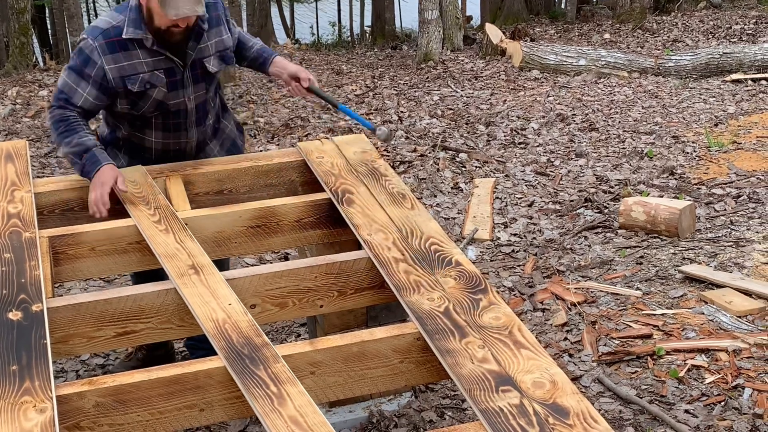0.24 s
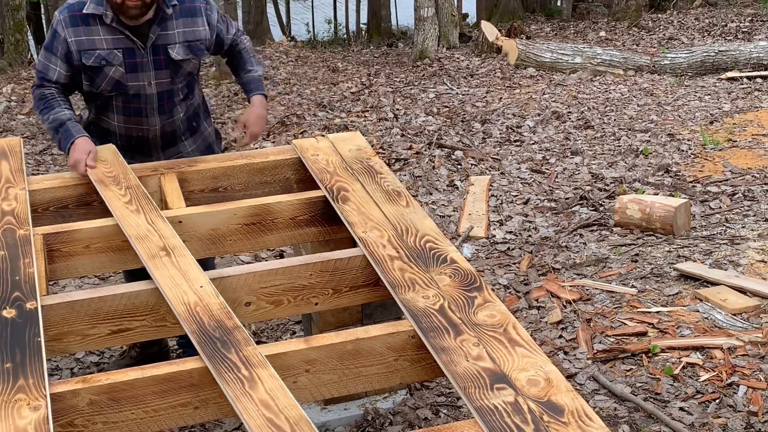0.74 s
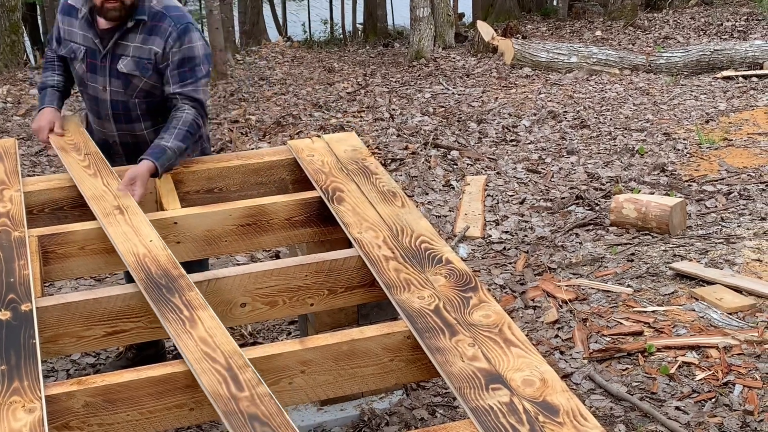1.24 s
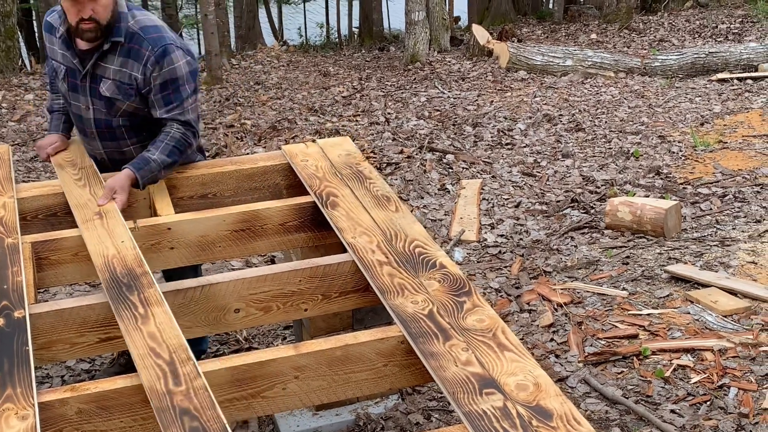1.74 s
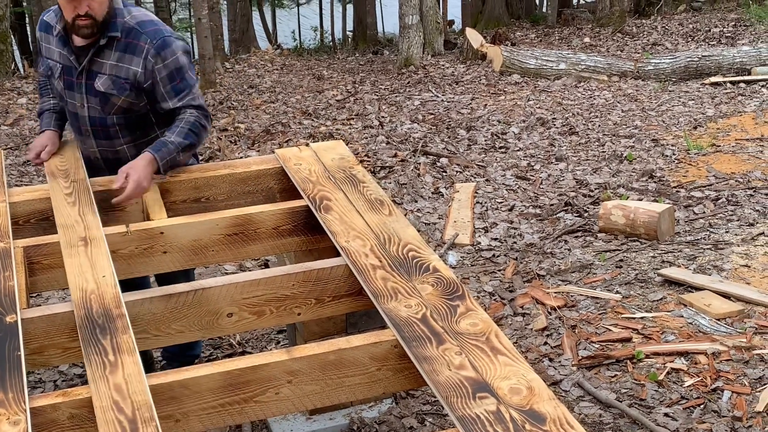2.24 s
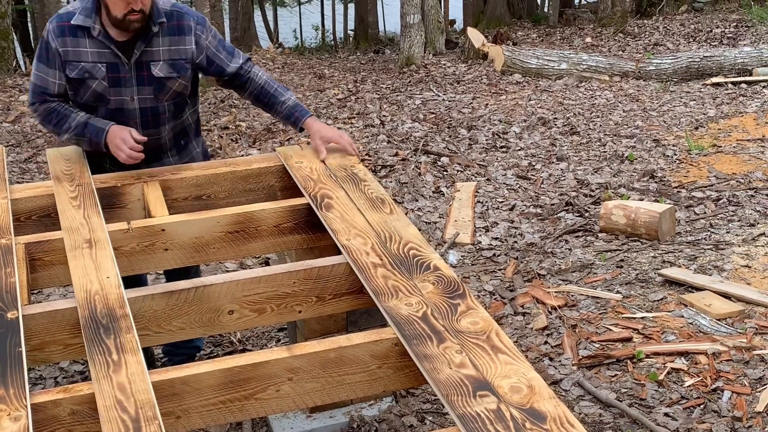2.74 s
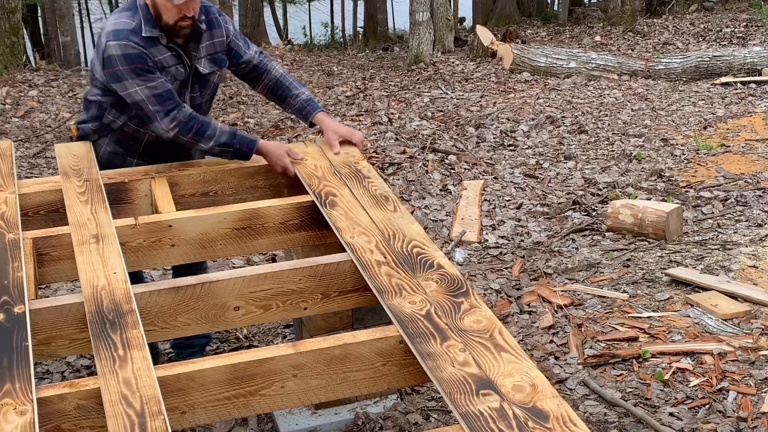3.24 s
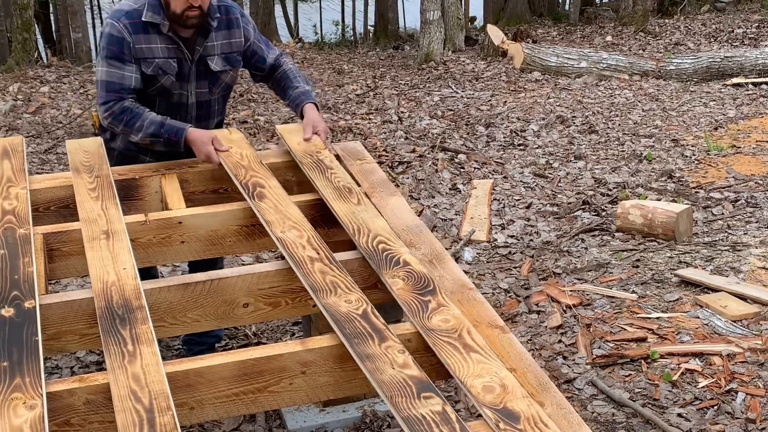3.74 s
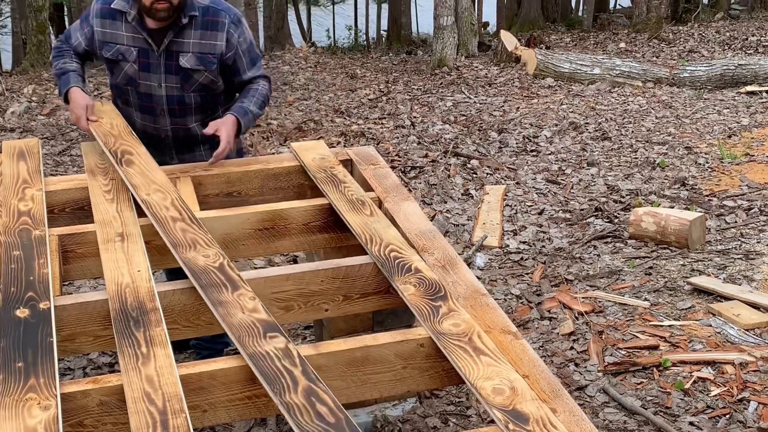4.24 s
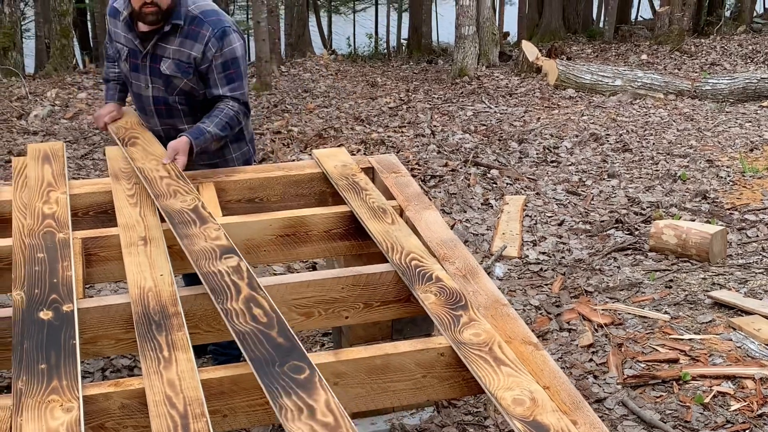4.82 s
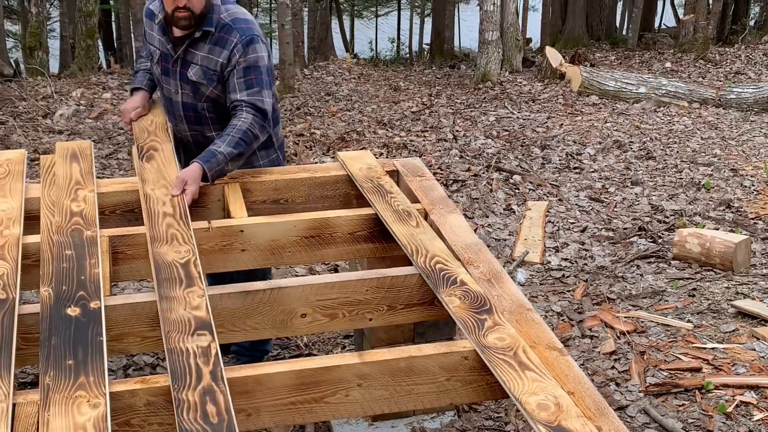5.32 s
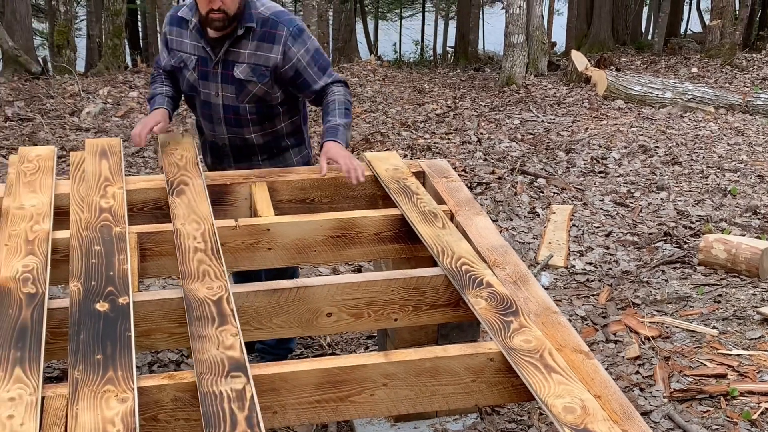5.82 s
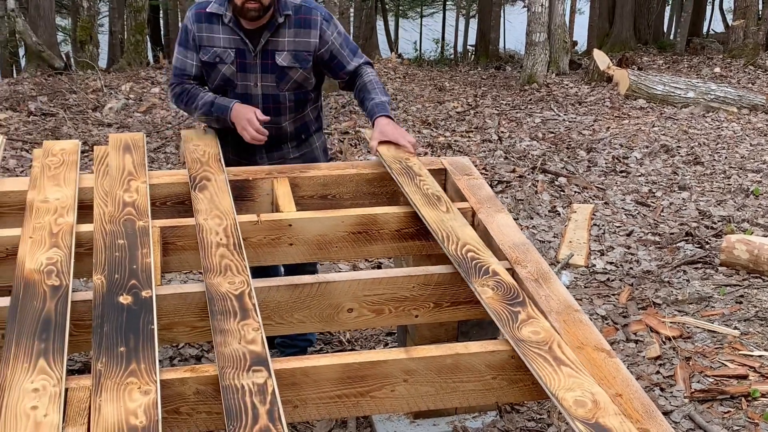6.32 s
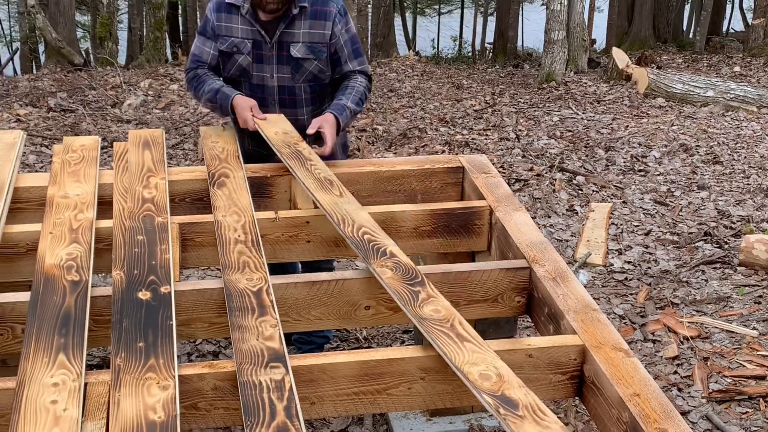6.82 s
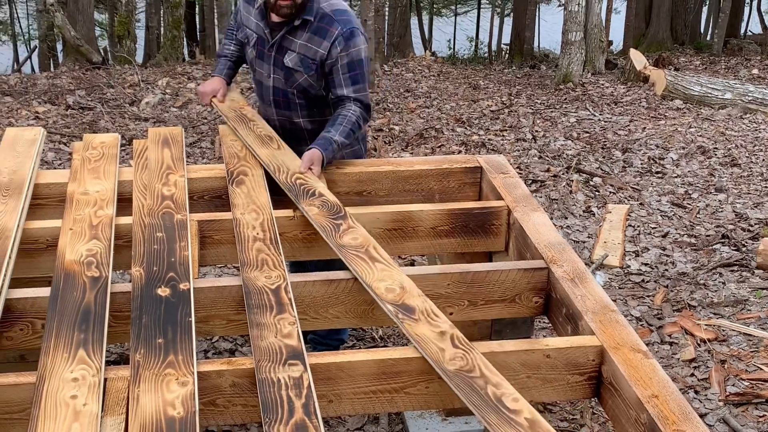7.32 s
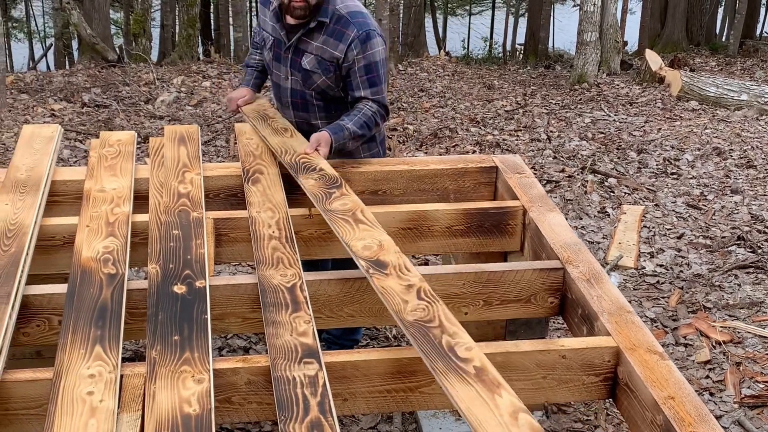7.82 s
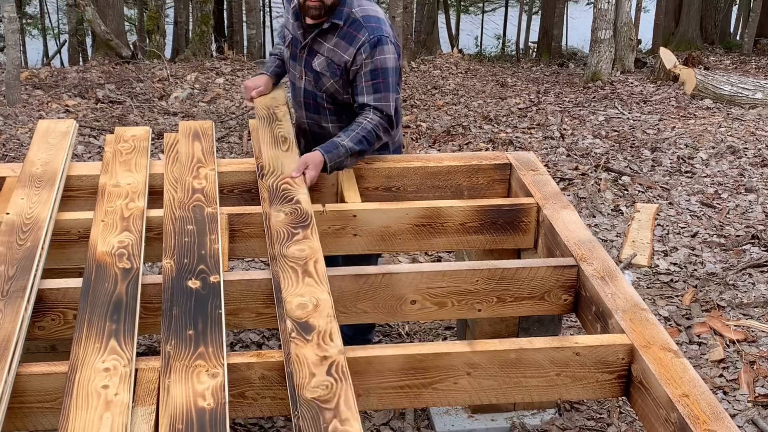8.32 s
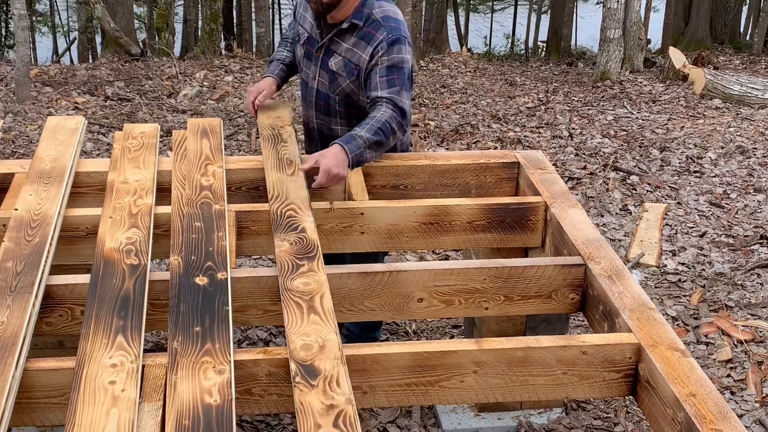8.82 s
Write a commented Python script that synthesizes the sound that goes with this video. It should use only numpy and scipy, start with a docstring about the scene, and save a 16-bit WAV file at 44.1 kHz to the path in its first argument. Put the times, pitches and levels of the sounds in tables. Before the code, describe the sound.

In still woodland, a close microphone picks up planks being moved by hand across wooden joists. They slide with a dry rasp and hiss, then land in short bouncing clacks that make the timber ring briefly. Three loud clatters fall in the first two thirds, followed by gentle scraping and a couple of lighter drops. The trees add a short dull echo over faint outdoor air.

```python
"""Long softwood boards are dropped, lifted and slid on a frame of joists in a quiet wood.
Each drop is a short rattle of contacts that rings the timber's modes. Sliding grain rasps and hisses;
a jolted or dragged board hums on one mode. Behind them: faint air and a dull tail from the trees.
Two close microphone ports hear almost the same timber sound, the treble later on the right."""
import sys
import numpy as np
from scipy import signal
from scipy.fft import rfft, irfft, next_fast_len
from scipy.io import wavfile

SR = 44100
rng = np.random.default_rng(int(sys.argv[2]) if len(sys.argv) > 2 else 0)


def wav_record(signal):
    """Record a signal, one row per channel, as 16-bit PCM in the file named by sys.argv[1]."""
    frames = np.transpose(np.atleast_2d(signal))
    bounded = np.clip(frames, -1, 1)
    # unit amplitude maps onto the largest positive 16-bit level
    quanta = np.round(bounded * 32767).astype(np.int16)
    wavfile.write(sys.argv[1], SR, quanta)


N = 400428

# swell of air and handling noise: time_s, level_db
BACKGROUND_SWELL = [(0, 1.5), (1.4, 3.5), (1.6, 1), (1.95, 1.5), (2.8, 2), (4.5, 1), (4.9, -1), (5.3, 2),
                    (6.2, 2.5), (7.4, 0.5), (7.8, 0.5), (8.25, 1), (9.08, 5)]
# outdoor air: freq_hz, level_db
AIR_SPECTRUM = [(25, -20.5), (45, 25.5), (76, -3.5), (400, 3), (1440, 1.5), (2500, -12.5), (4000, -14),
                (6500, -51.5), (10000, -52.5), (16000, -54.5)]
# phase between the ports: freq_hz, left_lead_rad
PORT_PHASE = [(0, 0), (260, .05), (400, -.3), (690, -.5), (1000, -.3), (1460, -.4), (2070, .2),
              (2450, 1.05), (3300, 1.3), (4800, 3.25), (6900, 6.3), (11200, 12.6), (15070, 18.85),
              (17400, 22.0)]
# balance of the ports: freq_hz, left_minus_right_db
PORT_BALANCE = [(60, 0.3), (260, 0), (520, -3.2), (700, -3.5), (1200, -1.8), (2000, -.8), (4000, 0.2)]
# single board modes singing: peak_s, swell_s, fade_s, pitch_hz, level_db
BOARD_HUMS = [(.815, 0.037, .32, 240, -37), (0.843, 0.058, 0.089, 63, -35), (.94, 0.041, 0.045, 1130, -55),
              (1.151, 0.045, 0.043, 1080, -50), (1.184, 0.052, 0.086, 476, -53),
              (1.269, 0.057, .04, 96, -51), (1.33, 0.037, .05, 473, -51), (5.45, 0.016, .04, 91, -38.5),
              (5.875, 0.013, .03, 183.6, -26.5), (6.655, 0.026, 0.045, 121.5, -36.5),
              (6.695, 0.034, .05, 154, -45), (6.86, 0.051, .05, 164, -51), (7.03, 0.15, 0.13, 185, -48.5),
              (7.181, 0.042, .04, 473, -49.5), (7.351, 0.081, 0.037, 161, -51.5),
              (8.749, .015, 0.024, 94.5, -41), (8.778, 0.041, 0.032, 1730, -40.5),
              (8.927, 0.022, 0.044, 141.3, -30.5)]
# steady handling: rumble_db, rasp_db, squeal_db, hiss_db, fizz_db, clatter_db
HANDLING_DB = (-63.5, -67.5, -75.5, -100, -99, -99)
# strokes over the joists: full_speed_s, rise_s, hold_s, fall_s, rasp_db, squeal_db, hiss_db, fizz_db
SLIDE_STROKES = [(0.1, 0.18, 0.027, 0.16, -87, -70, -81, -93),
                 (0.39, 0.14, 0.16, 0.34, -71, -66.5, -84, -94),
                 (0.681, 0.1, 0.74, 0.06, -60, -59.5, -72, -67),
                 (0.8, 0.19, 0.012, 0.19, -47.5, -56, -62.5, -64),
                 (1.2, 0.31, 0.06, 0.17, -56.5, -57.5, -68, -80),
                 (2.06, 0.042, 0.082, 0.046, -60.5, -53.5, -84, -84),
                 (2.17, 0.071, 0.011, 0.086, -50, -48, -79, -88),
                 (2.33, 0.065, 0.071, 0.04, -53, -57, -87, -97),
                 (2.56, 0.043, 0.01, 0.43, -52.5, -87, -99, -105),
                 (2.7, 0.075, 0.4, 0.23, -70, -67, -92, -105),
                 (3.4, 0.39, 0.2, 0.36, -62.5, -57.5, -69.5, -83),
                 (3.869, 0.26, 0.28, 0.2, -55, -58.5, -71.5, -78),
                 (4.22, 0.32, 0.091, 0.16, -40, -46.5, -56, -57),
                 (4.359, 0.079, 0.26, 0.04, -63, -56.5, -68.5, -70),
                 (5.33, 0.096, 0.01, 0.055, -38, -50.5, -69, -74),
                 (5.53, 0.076, 0.12, 0.21, -59, -51.5, -68.5, -77),
                 (5.75, 0.1, 0.083, 0.23, -57, -56, -93, -97),
                 (6.3, 0.11, 0.066, 0.34, -66.5, -61.5, -92, -99),
                 (6.61, 0.13, 0.021, 0.075, -62.5, -51, -70, -80),
                 (6.8, 0.13, 0.58, 0.12, -66, -62.5, -87, -100),
                 (7.08, 0.17, 0.093, 0.22, -58.5, -55, -62, -68),
                 (8.33, 0.03, 0.033, 0.22, -66, -56, -80, -86),
                 (8.51, 0.079, 0.38, 0.044, -77, -60.5, -61.5, -79),
                 (8.68, 0.14, 0.057, 0.1, -72, -53.5, -51, -72),
                 (8.801, 0.067, 0.036, 0.1, -55, -49, -63, -85)]
# friction and clatter spectra: freq_hz, level_db
RUMBLE_SPECTRUM = [(25, -56.5), (45, 0), (80, 5), (160, -2.5), (260, -8.5), (400, -26.5)]
RASP_SPECTRUM = [(150, -0.5), (300, 2), (500, -2), (1100, -11), (1500, -41), (2400, -50.5)]
SQUEAL_SPECTRUM = [(900, -6.5), (1400, 4.5), (1750, 2), (2400, -4), (3500, -6.5), (5000, -8)]
HISS_SPECTRUM = [(3500, -36.5), (5200, -1), (6300, 8), (7000, 8), (8000, -4.5), (10000, -34.5)]
FIZZ_SPECTRUM = [(4000, -27.5), (7500, -28), (10000, 12), (12000, 6), (13500, 10.5), (15800, 5)]
CLATTER_SPECTRUM = [(150, -0.5), (350, 6), (700, 6), (1200, 4), (2000, -9.5), (3500, -29.5), (7000, -52)]
# contact transient spectra: freq_hz, level_db
CRACK_SPECTRUM = [(1800, -46.5), (3000, 1), (5000, 1.5), (6500, 4.5), (9000, -6.5), (15500, -7)]
TICK_SPECTRUM = [(1200, -19), (2200, 2.5), (3500, -1.5), (5000, -5.5), (8000, -21.5)]
# modes of boards and joists: pitch_hz, level_db, t60_s
TIMBER_MODES = [(55.6, -17.5, 0.46), (80, -1.5, 0.11), (98.6, -2.5, 0.24), (118.5, -5.5, 0.083),
                (147, 9, 0.062), (187.5, -1, 0.23), (226, 0, 0.2), (234.9, 3, 0.27), (287, -0.5, 0.095),
                (352, -7.5, 0.25), (409.4, 3.5, 0.17), (450.5, 3.5, 0.15), (482.8, 3.5, 0.19),
                (560.5, 2.5, 0.15), (682.3, -2.5, 0.071), (701.6, 0.5, 0.12), (803.6, -4, 0.15),
                (875, -3.5, 0.13), (991, -1.5, 0.12), (1103, -9, 0.14), (1225, 2, 0.079),
                (1350, -10, 0.033), (1477, 6.5, 0.058), (1592, 6, 0.0048), (1812, -0.5, 0.072),
                (2095, -7, 0.06), (2532, -10, 0.065), (2603, -23.5, 0.042), (3250, -15, 0.012),
                (3500, -8.5, 0.025)]
# wood-on-wood contacts: start_s, clack_db, thud_db, thump_db, knock_db, snap_db, crack_db
# (last five relative to clack_db)
CONTACTS = [(0.774, -48.5, -5, -2, 12, 6, 13), (0.789, -44, 5.5, 11, 2, -9, -19),
            (0.801, -40, 8, 17, 3, -1, -3), (0.81, -50, 9, 12, 3, -9, 0),
            (0.865, -58, -30, 26, -5, -23, -6), (0.925, -53, -36, 22.5, -20, -29, -3),
            (1.378, -61, 1, -16, 2.5, 22, -3), (1.999, -23.5, -23.5, 6.5, 4.5, -8.5, -14),
            (2.01, -27, -4.5, 1.5, 2, -2, -17), (2.021, -27, -6, -7.5, 3, -35, -17),
            (2.035, -30, -3.5, 0, -5, -27, -21.5), (2.052, -38, 4.5, 9.5, -3.5, -22.5, -46),
            (2.087, -31, 4.5, -3.5, 9, -29, -21.5), (2.102, -35, -0.5, -0.5, 2.5, -23, -21),
            (2.132, -45, -5, -4.5, -0.5, -4, -16), (2.186, -16.5, -10.5, -2, -3.5, -19, -41),
            (2.197, -18.5, -8, -7.5, -2.5, -24, -47), (2.208, -23, -11.5, 2, -3.5, -25.5, -60),
            (2.223, -35.5, -4.5, 2.5, -3, -22, -43), (2.25, -34.5, -3, -1.5, 3.5, -22, -44),
            (2.282, -36, -2, -10, -8, -20, -32), (2.294, -41, 14, -4.5, -8.5, -20.5, -30.5),
            (2.382, -1, -27.5, -28, -14, -12.5, -43.5), (2.387, -3.5, -29, -12.5, -17, -26.5, -52.5),
            (2.403, -18, -21.5, -10.5, -4, -21.5, -56), (2.428, -13.5, -21.5, -12, -11, -23, -47),
            (2.445, -16, -20.5, -6, -9, -34.5, -55), (2.48, -27, -9.5, -3, -6, -30.5, -49),
            (2.527, -41.5, 9, 7, 0, -34, -37), (2.595, -49.5, 8.5, 16, 9.5, -23, -43.5),
            (2.635, -46.5, 1.5, 18.5, -2, -19, -40), (3.071, -54.5, 1, 4, 7, -33.5, -42),
            (3.157, -46, 6, 3.5, 3, 1, -0.5), (3.335, -49, 6.5, -16, -3, -16, -4),
            (3.403, -47.5, -2, -20, 8.5, 11, 14), (3.412, -36, -3, -13, -12, 0.5, 10),
            (3.42, -44, -8, -2, -13, 8, 8), (3.533, -37.5, -3, -16, -5.5, 4.5, 6),
            (3.661, -49.5, 3.5, 9, 10, 3, -6), (3.873, -65, 4.5, 10.5, 15, 8, 21),
            (3.935, -37, -31, 5, -0.5, -6, -10.5), (4.053, -27.5, 2.5, 5, -4, -13, -37),
            (4.065, -6, -17.5, -13, -6, -8.5, -49), (4.082, -19.5, -5, -6.5, 5, -12, -20.5),
            (4.089, -38.5, 2, 1, 0.5, -9, -3), (4.104, -26, -4, 4.5, -5, -33, -37.5),
            (4.129, -33, 2.5, 2, -2, -24, -32), (4.179, -35, 7, 16.5, 14.5, -19, -35),
            (4.197, -36, 5, 8.5, 12.5, -37, -22), (4.214, -43, 4, 6, 10, -20, -30),
            (4.268, -48, -2, 0, 0, -5, 9), (4.306, -45, 8, 10.5, -1, -15, -20),
            (4.324, -26, -24, -12, -15, -7.5, -19), (4.338, -30, -14, -6, -4, -5, -15),
            (4.353, -40.5, -4.5, -1, 4.5, -10, -20), (4.37, -52.5, 24, -8, 16, -12, -12),
            (5.287, -4.5, -23.5, -13.5, -11, -7, -25.5), (5.298, -6.5, -16, -8, -14.5, -3.5, -34.5),
            (5.306, -17.5, -27, -12.5, -2, -3.5, -26), (5.309, -21, -21.5, 6, -39.5, -20, -26),
            (5.346, -27, -8, 1.5, -19, 7, -23), (5.355, -19.5, -11, -1, -18.5, 3, -25.5),
            (5.361, -19, -5.5, -7.5, -4, 2, -17), (5.371, -19, 1, -1, 5, -5, -31),
            (5.381, -10, -16.5, -18, -18.5, -7.5, -41), (5.398, -15.5, -3.5, -7, -15, -12, -39),
            (5.448, -38.5, 11.5, -2, 4, -36, -32), (5.479, -33.5, -12, 1, -0.5, -7, -49),
            (5.525, -20, -7.5, -7, -5.5, -4.5, -34), (5.578, -40.5, 9, 13.5, 0, -6, -7),
            (5.838, -37, 0.5, -1.5, -5, 8, -4), (5.844, -18, -4, -5, -7, 6, -16),
            (5.873, -24, -4, 5.5, -3.5, 1, -36), (5.905, -44, -3, 20, -7, -2, -31),
            (6.58, -63, -8, -9, -15, 14, -4), (6.611, -45, 12, -5, -4.5, -6, -11),
            (6.645, -53, 4, -11, 4.5, 0, -5), (7.169, -56.5, 15.5, 12, -5, -10, 13),
            (7.348, -58.5, 11, 12, 2, -11, -14), (7.6, -62.5, 15, -2, -0.5, -21, -22),
            (8.159, -69, 26, -9.5, 10, -3.5, -19.5), (8.298, -19, -29, 7, -11, 7, -17),
            (8.306, -20, -14, -0.5, -3, 8.5, -13), (8.322, -28, 7.5, 9.5, 2, -22, -4.5),
            (8.345, -39.5, 10, 6, 12, -11, -4), (8.395, -37.5, 1, 3, -8, -1, -32),
            (8.403, -39, 2, 13, 6, 3.5, -33), (8.807, -52.5, 21.5, -3, -18, 5, -19),
            (8.89, -45, -3, -17, -8.5, 13, -22), (8.895, -20.5, 2, -3, -3.5, 8, -14.5),
            (8.913, -36, 8, 18, 0.5, 9, -29), (9.02, -44, 9.5, -11, -1, -0.5, -35)]

THUD_HZ, THUMP_HZ, KNOCK_HZ, CLACK_HZ, SNAP_HZ = 94, 223.6, 448, 1140, 1596


def from_db(db):
    """dB to gain."""
    return 10 ** (np.asarray(db) / 20)


def unit_rms(x):
    """Scale to rms 1."""
    return x / np.sqrt(np.mean(x ** 2) + 1e-20)


def db_at(spectrum, hz):
    """Read a spectrum on a log-frequency axis."""
    freq_hz, level_db = np.transpose(spectrum)
    return np.interp(np.log(hz), np.log(freq_hz), level_db)


def drift(rate_hz):
    """Slow random wander, rms 1."""
    hop = 40
    pole = np.exp(-2 * np.pi * rate_hz * hop / SR)
    slow = signal.lfilter([1], [1, -2 * pole, pole * pole], rng.standard_normal(N // hop + 2002))[2000:]
    return np.interp(np.arange(N) / hop, np.arange(len(slow)), unit_rms(slow))


def colour(x, spectrum, band_hz=(0, 22050)):
    """Filter by a spectrum; rms gain 1 for the part within band_hz."""
    size = next_fast_len(N)
    hz = np.arange(size // 2 + 1) * SR / size + 1
    skirts = np.minimum(1, hz / spectrum[0][0]) ** 2 * np.minimum(1, spectrum[-1][0] / hz) ** 2
    gain = from_db(db_at(spectrum, hz)) * skirts
    in_band = gain * (hz > band_hz[0]) * (hz < band_hz[1])
    return irfft(rfft(x, size) * gain / np.sqrt(np.mean(in_band ** 2)), size)[..., :N]


def ring(force, hz, t60_s):
    """One mode: a unit impulse rings a decaying sine of height 1."""
    radius, step_rad = from_db(-60 / (t60_s * SR)), 2 * np.pi * hz / SR
    return signal.lfilter([.5, 0, -.5], [1, -2 * radius * np.cos(step_rad), radius ** 2], force + 1e-18)


def air():
    """Faint swelling noise: a shared part and an independent part per side."""
    swell_db = np.interp(np.arange(N) / SR, *np.transpose(BACKGROUND_SWELL))
    noise = from_db(swell_db - 68) * colour(rng.standard_normal((3, N)), AIR_SPECTRUM)
    return noise[0], from_db(9) * noise[1:]


def tree_echoes(x, level_db=-16, t60_s=0.18, rise_s=0.011, band_hz=(320, 1.41 * 750)):
    """Trunks scatter a dull noise tail, different on each side."""
    t = np.arange(round(.8 * SR)) / SR
    tail = rng.standard_normal((2, len(t))) * from_db(-60 * t / t60_s) * np.minimum(1, t / rise_s)
    tail = signal.sosfilt(signal.butter(2, band_hz, "band", fs=SR, output="sos"), tail)
    return from_db(level_db) * signal.fftconvolve(x[None], tail / np.linalg.norm(tail), axes=1)[:, :N]


def treble_decorrelation(hz, size, level_db=-19, t60_s=0.02, highpass_hz=1500):
    """Frequency response of a very short random treble tail, different per side."""
    t = np.arange(4096) / SR
    tail = rng.standard_normal((2, len(t))) * from_db(-60 * t / t60_s)
    highpass = hz ** 2 / (hz ** 2 + highpass_hz ** 2)
    return from_db(level_db) * rfft(tail / np.linalg.norm(tail[0]), size) * highpass


def ports(x):
    """Mono to two ports: phase and balance vary with frequency; the highs widen slightly."""
    size = next_fast_len(N + 8192)
    hz = np.arange(size // 2 + 1) * SR / size
    lead_rad = np.interp(hz, *np.transpose(PORT_PHASE))
    left = from_db(db_at(PORT_BALANCE, hz + 1) / 2) * np.exp(.5j * lead_rad)
    response = np.array([left, 1 / left]) + treble_decorrelation(hz, size)
    return irfft(rfft(x, size) * response, size)[:, :N]


def hums(t60_cycles=38):
    """Friction noise through one narrow board mode, swelling and fading."""
    t, out = np.arange(N) / SR, np.zeros(N)
    for peak_s, swell_s, fade_s, hz, level_db in BOARD_HUMS:
        active = (t > peak_s - swell_s) & (t < peak_s + fade_s)
        off_peak = np.where(t < peak_s, (peak_s - t) / swell_s, (t - peak_s) / fade_s)[active]
        tone = ring(rng.standard_normal(SR), hz, t60_cycles / hz)[-active.sum():]
        out[active] += from_db(level_db) * np.cos(np.pi / 2 * off_peak) ** 2 * unit_rms(tone)
    return out


def motion_db(stroke_exponent=4.3):
    """Rumble, rasp, squeal, hiss, fizz, clatter levels: handling, strokes and shaking add as power."""
    t = np.arange(0, N + 64, 64) / SR
    swell_db = np.interp(t, *np.transpose(BACKGROUND_SWELL))
    power = np.outer(from_db(HANDLING_DB), from_db(swell_db)) ** 2
    for full_s, rise_s, hold_s, fall_s, rasp_db, *treble_db in SLIDE_STROKES:
        off_peak = np.where(t < full_s, (full_s - t) / rise_s, (t - full_s - hold_s) / fall_s)
        speed = np.cos(np.pi / 2 * np.clip(off_peak, 0, 1)) ** stroke_exponent
        rumble_db = rasp_db - 6.5
        power[:-1] += np.outer(from_db([rumble_db, rasp_db, *treble_db]), speed) ** 2
    for start_s, clack_db, thud_db, _, knock_db, *_ in CONTACTS:
        for layer, offset_db, rise_s in ((0, thud_db - 17.5, 0.056),  # frame shudders
                                         (1, knock_db - 28.5, 0.04),  # loose boards rattle
                                         (5, -24.5, 0.01)):  # board ends clatter
            age = np.maximum(t - start_s, 0) / rise_s
            power[layer] += (from_db(clack_db + offset_db) * age * np.exp(1 - age)) ** 2
    return [np.interp(np.arange(N) / SR, t, 10 * np.log10(row)) for row in power]


def rub_resonances(x, range_hz=(900, 15000), count=16, q=9, depth=.48):
    """Resonances of the rubbing faces swell and sink independently as the contact moves."""
    peaks = [signal.lfilter(*signal.iirpeak(hz, q, SR), x) for hz in np.geomspace(*range_hz, count)]
    return x + depth * sum(drift(5.5) * peak for peak in peaks)


def sliding(splinters_per_s=1500):
    """Grain drags on grain: frame rumble, board rasp and squeal, contact hiss and fizz, end clatter."""
    rumble_db, rasp_db, squeal_db, hiss_db, fizz_db, clatter_db = motion_db()
    stick_slip_db = 1.2 * drift(3.8)
    lumps_db = 3 * drift(12)
    rumble = colour(rng.standard_normal(N) * from_db(rumble_db + lumps_db), RUMBLE_SPECTRUM)
    grain_db = stick_slip_db + 1.2 * drift(40) + 1.5 * drift(200)
    splinters = (rng.random(N) < splinters_per_s / SR) * np.minimum(rng.exponential(1.2, N), 3)
    friction = rng.standard_normal(N) * (1 + splinters) * from_db(grain_db)
    rasp = colour(friction * from_db(rasp_db), RASP_SPECTRUM)
    for hz, mode_db, t60_s in TIMBER_MODES[6:26]:  # the rub wanders over the middle modes
        drive = friction * from_db(rasp_db + 5.5 * drift(6.2))
        rasp += from_db(mode_db - 51.5) * ring(drive, hz, t60_s)
    squeal = colour(friction * from_db(squeal_db + 0.5 * drift(45)), SQUEAL_SPECTRUM)
    hiss = colour(friction * from_db(hiss_db + 0.57 * drift(11)), HISS_SPECTRUM, band_hz=(5500, 8000))
    fizz = colour(friction * from_db(fizz_db + 1.5 * drift(15)), FIZZ_SPECTRUM, band_hz=(10000, 12500))
    clatter = colour(friction * from_db(clatter_db + 2.4 * drift(90)), CLATTER_SPECTRUM)
    return clatter + rumble + rasp + rub_resonances(squeal + hiss + fizz)


def contact_force(level_db, grit, rise_ms, lead_ms=0, hz=None):
    """One gritty burst per contact, scaled by its energy or, given hz, mainly by its strength there."""
    rise_s = rise_ms / 1000
    t = np.arange(min(grit.shape[1], round(9 * SR * rise_s))) / SR
    bursts = grit[:, :len(t)] * t * np.exp(-t / rise_s)
    strength = np.linalg.norm(bursts, axis=1)
    if hz:
        strength = np.hypot(np.abs(bursts @ np.exp(2j * np.pi * hz * t)), .5 * strength)
    bursts *= (from_db(level_db) / strength)[:, None]
    force = np.zeros(N + len(t))
    for (start_s, *_), burst in zip(CONTACTS, bursts):
        start = round((start_s - lead_ms / 1000) * SR)
        force[start:start + len(t)] += burst
    return force[:N]


def drops(lead_ms=.6, delay_at_1hz_s=0.074):
    """Each contact cracks, clicks, ticks and rings every mode; low modes start later and build slower."""
    _, clack_db, thud_db, thump_db, knock_db, snap_db, crack_db = np.transpose(CONTACTS)
    grit = rng.standard_normal((len(CONTACTS), 4096))
    spot_db = rng.normal(0, 3.26, (len(CONTACTS), len(TIMBER_MODES)))  # each spot favours other modes
    bands_hz = [THUD_HZ, THUMP_HZ, KNOCK_HZ, CLACK_HZ, SNAP_HZ]
    bands_db = np.transpose([thud_db, thump_db, knock_db, np.zeros_like(clack_db), snap_db])
    modes = np.zeros(N)
    for k, (hz, mode_db, t60_s) in enumerate(TIMBER_MODES):
        tone_db = np.array([np.interp(np.log(hz), np.log(bands_hz), row) for row in bands_db])
        drive_db = clack_db + tone_db + mode_db + spot_db[:, k] - 13.5
        delay_ms = 1000 * delay_at_1hz_s * (hz ** -.5 - SNAP_HZ ** -.5)  # bending-wave dispersion
        rise_ms = 1.56 + 0.93 * 1000 / hz
        force = contact_force(drive_db, grit, rise_ms, lead_ms - delay_ms, hz)
        soft_force = signal.sosfilt(signal.butter(3, 1.73 * hz, fs=SR, output="sos"), force + 1e-18)
        for detune in (-.035, 0, .035):  # three slightly unlike boards
            modes += ring(soft_force, hz * (1 + detune), t60_s) * (-1) ** k
    crack = contact_force(clack_db + crack_db + 21, grit, rise_ms=4.54, lead_ms=lead_ms)
    click = contact_force(clack_db + crack_db + 11.5, grit, rise_ms=0.46)
    tick = contact_force(clack_db + snap_db - 11.5, grit, rise_ms=0.42)
    return modes + colour(crack + click, CRACK_SPECTRUM) + colour(tick, TICK_SPECTRUM)


def scene():
    """Timber and shared air through the ports, plus side air and tree echoes."""
    timber = drops() + sliding() + hums()
    shared_air, side_air = air()
    return ports(timber + shared_air) + side_air + tree_echoes(timber)


def record(dry, highpass_hz=55, ceiling=1.2, lowpass_hz=15950):
    """Microphone: bass cut, soft clip, steep top cut."""
    thinned = signal.sosfilt(signal.butter(2, highpass_hz, "high", fs=SR, output="sos"), dry)
    rounded = ceiling * np.tanh(thinned / ceiling)
    return signal.sosfilt(signal.ellip(10, .5, 60, lowpass_hz, fs=SR, output="sos"), rounded)


dry = scene()
out = record(dry)
wav_record(out)
```